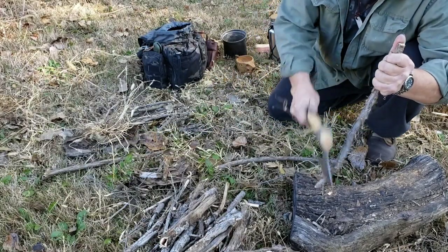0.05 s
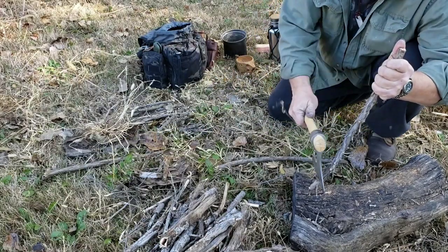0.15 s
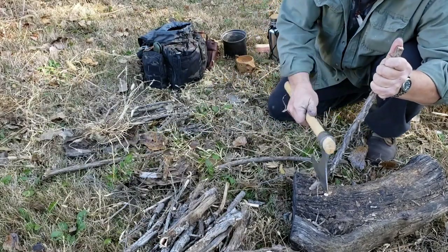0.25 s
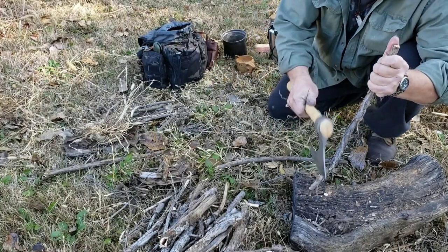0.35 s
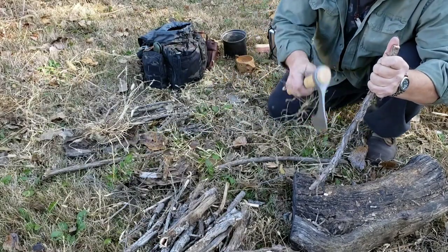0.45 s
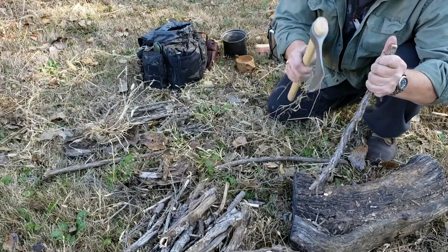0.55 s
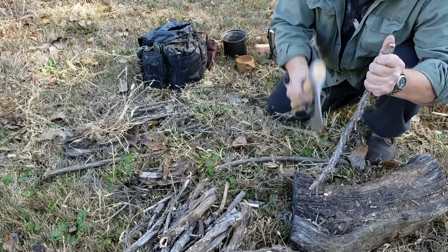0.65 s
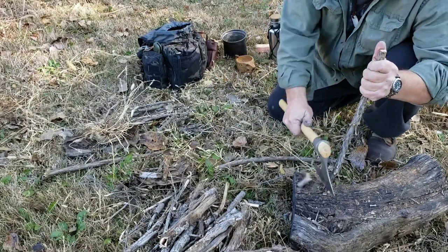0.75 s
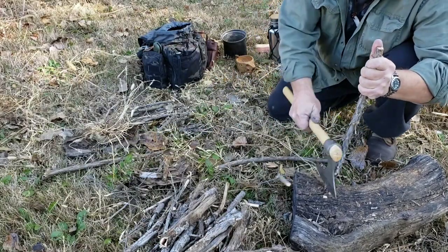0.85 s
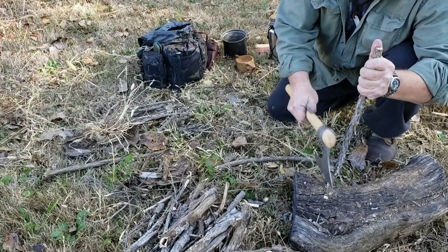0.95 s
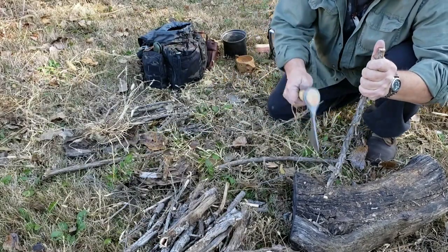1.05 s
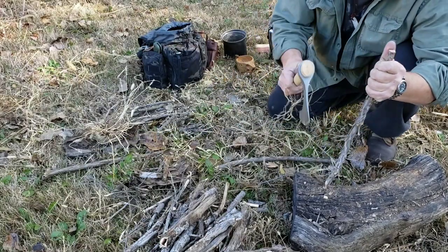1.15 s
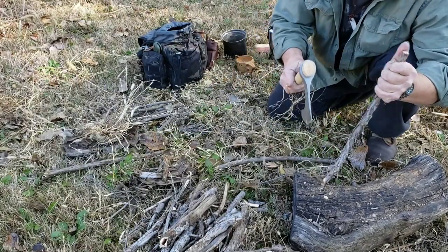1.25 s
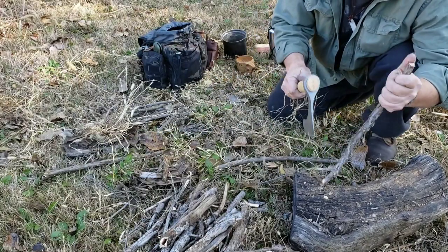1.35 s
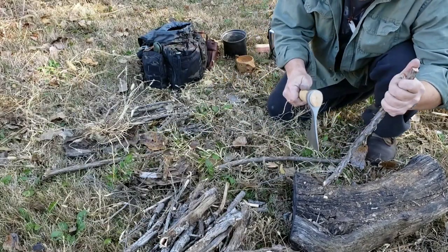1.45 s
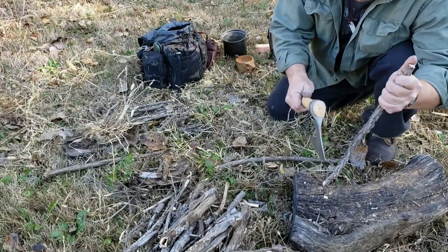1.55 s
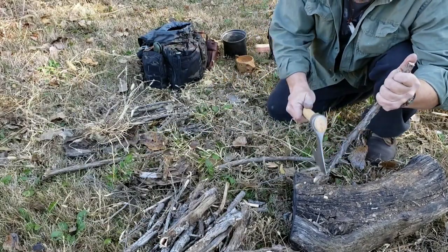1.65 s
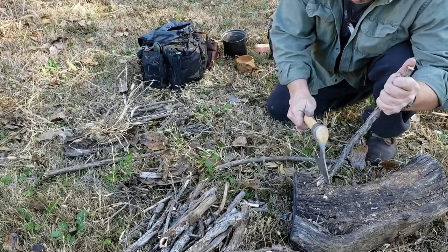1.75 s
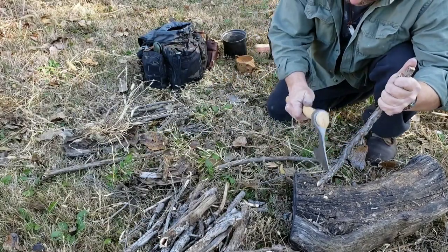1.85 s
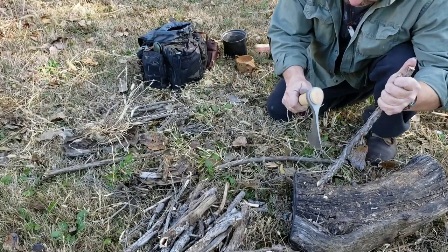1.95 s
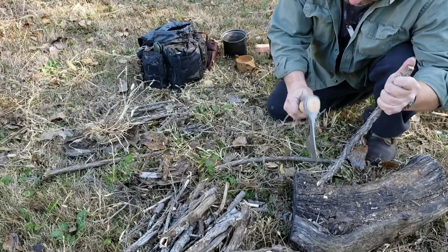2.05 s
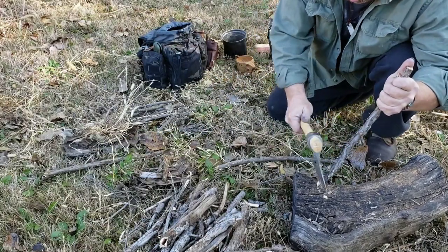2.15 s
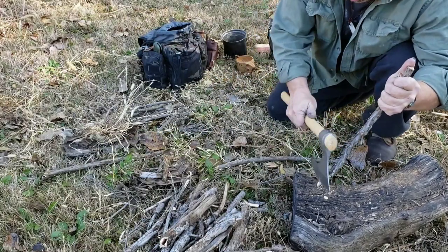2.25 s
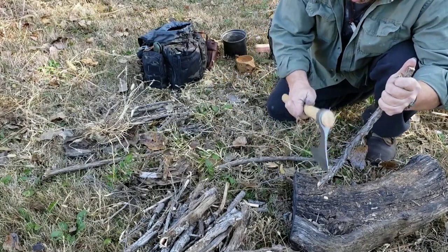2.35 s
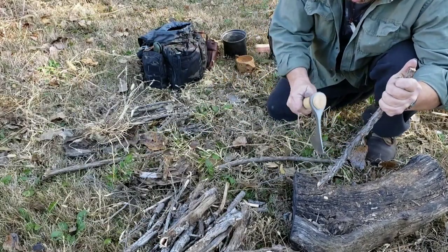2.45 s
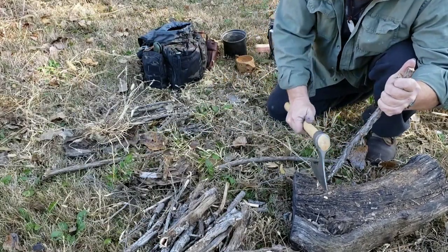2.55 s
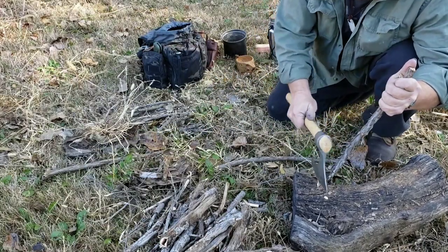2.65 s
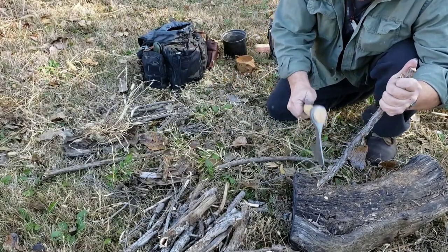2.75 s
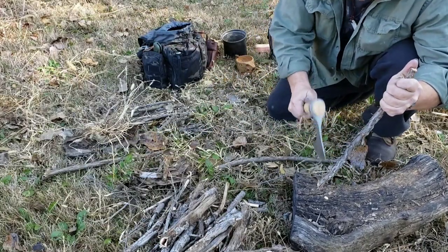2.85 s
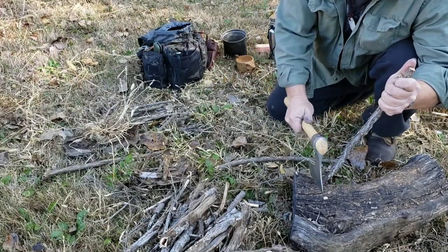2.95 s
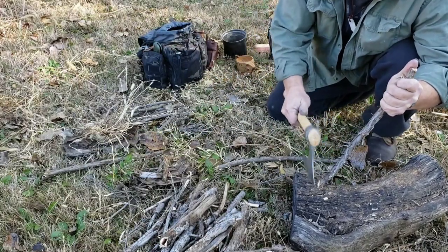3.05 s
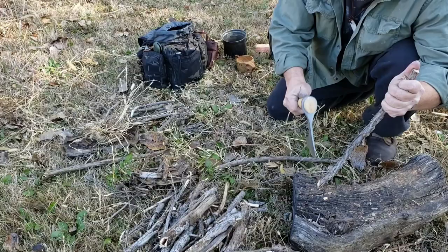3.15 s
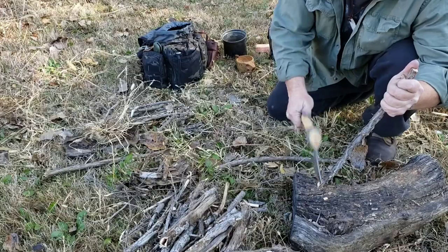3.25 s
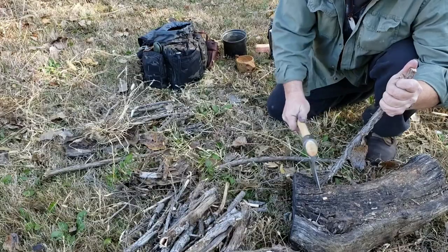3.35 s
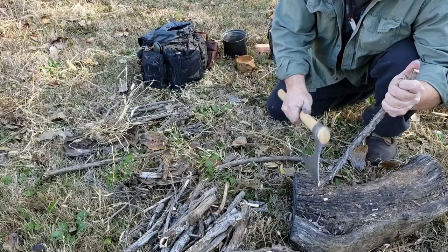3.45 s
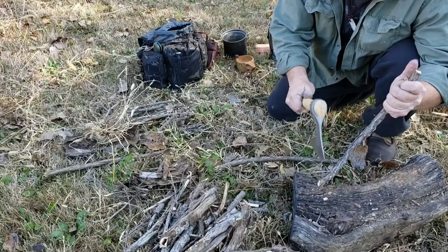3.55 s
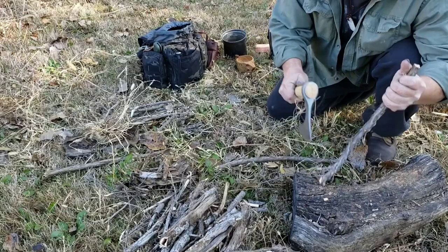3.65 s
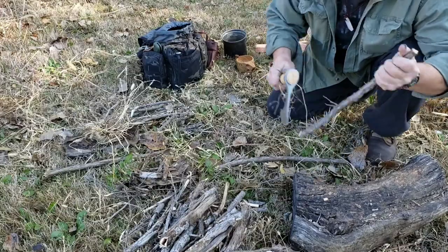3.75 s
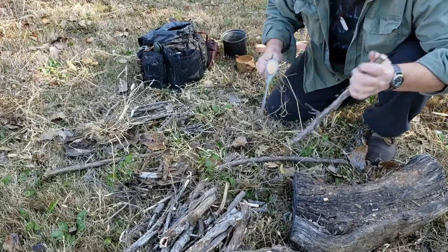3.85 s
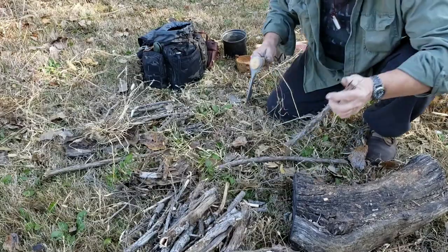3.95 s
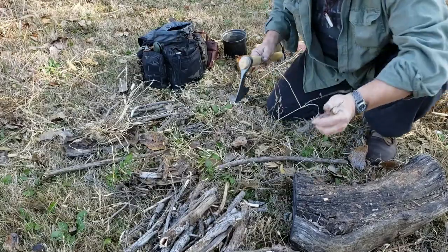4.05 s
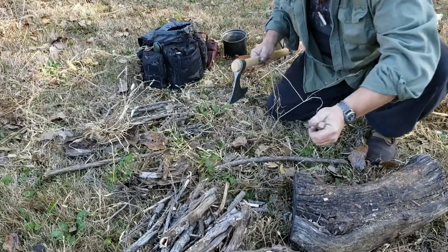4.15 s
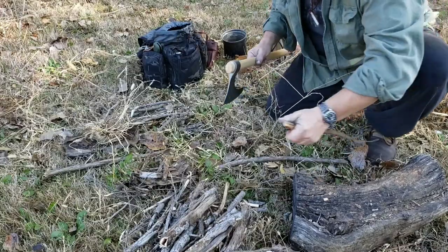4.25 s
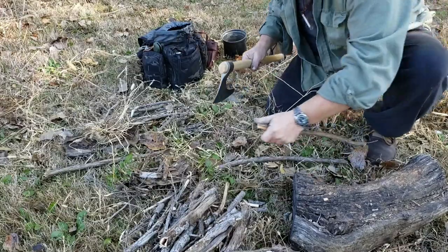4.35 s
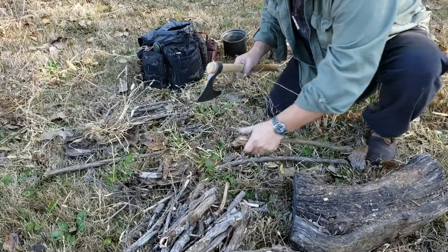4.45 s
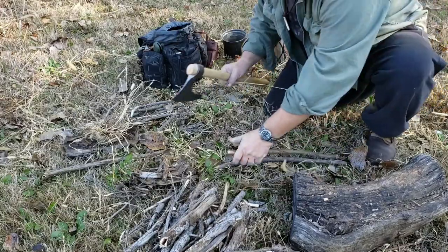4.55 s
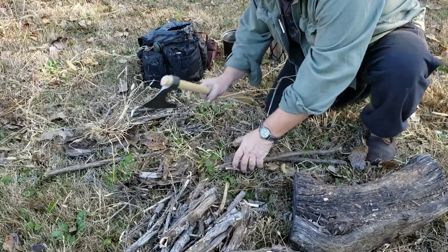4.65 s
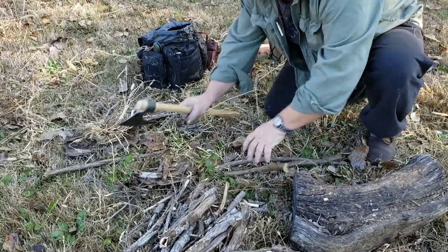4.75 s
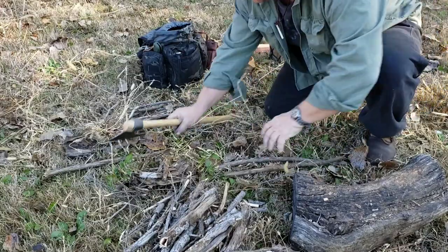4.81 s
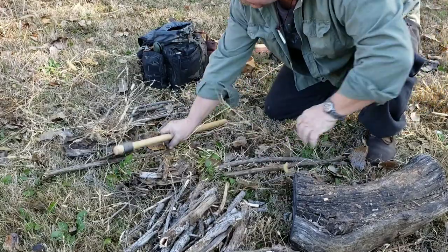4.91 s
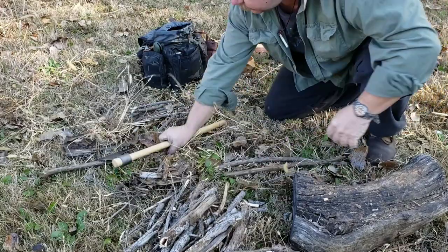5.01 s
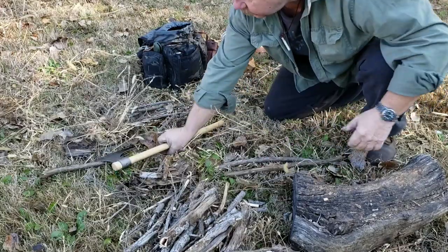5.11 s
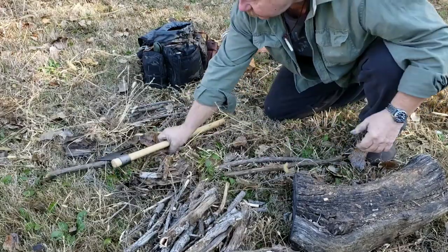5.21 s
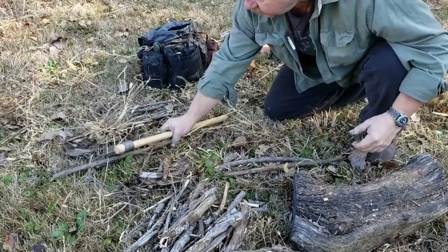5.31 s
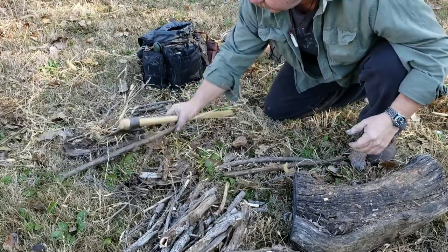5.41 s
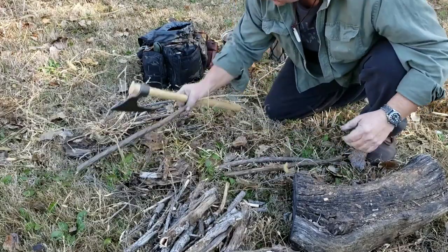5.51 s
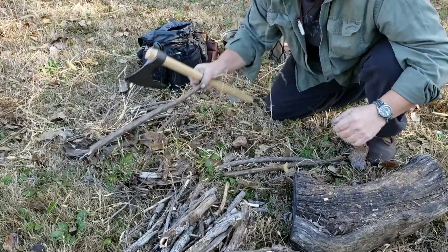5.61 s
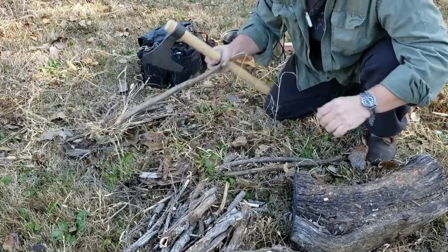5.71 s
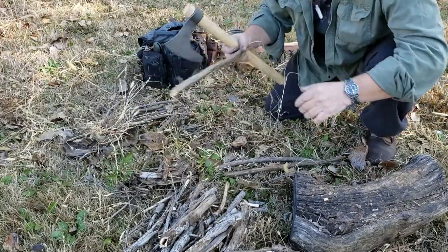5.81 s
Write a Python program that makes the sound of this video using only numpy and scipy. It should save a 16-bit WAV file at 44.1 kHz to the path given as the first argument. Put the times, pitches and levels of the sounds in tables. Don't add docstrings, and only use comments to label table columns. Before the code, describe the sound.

Six sharp, dry wood chops with snapping fibres and ticking chips, followed by soft grassy rustling and low thumping wind buffets in an open field.

```python
import sys
import numpy as np
from scipy import signal
from scipy.fft import rfft, irfft
from scipy.io import wavfile
from scipy.ndimage import uniform_filter1d

SR = 44100
rng = np.random.default_rng(int(sys.argv[2]) if len(sys.argv) > 2 else 0)


def amp(db):
    return 10 ** (np.asarray(db, float) / 20)


def write(x):
    x = np.atleast_2d(x).T
    wavfile.write(sys.argv[1], SR, np.round(np.clip(x, -1, 1) * 32767).astype(np.int16))


N = 259131

# (time [s], log level [dB], rocking [dB], scatter level [dB], shudder level [dB])
CHOPS = [
    (.179, -25, 12.5, -37.5, -44),
    (0.8153, -28.5, 8, -31.5, -47),
    (2.228, -28, 3.8, -45.5, -50),
    (2.6409, -26.5, 4.6, -46.5, -49),
    (3.016, -26, 4, -52.5, -41),
    (3.3842, -29.5, 2.5, -48, -46),
]


def evened(x):
    return x / np.sqrt(np.mean(x ** 2) + 1e-20)


def read(points, hz):
    f, value = np.transpose(points)
    return np.interp(np.log(hz + 1), np.log(f + 1), value)


def add(mix, start_s, sound):
    part = mix[max(round(start_s * SR), 0):][:len(sound)]
    part += sound[:len(part)]


def ring(modes, seconds, pitch=1.0, longer=0.94):
    t = np.arange(round(seconds * SR)) / SR
    return sum(amp(db - 60 * t / (t60_s * longer)) * np.sin(2 * np.pi * hz * pitch * t)
               for hz, db, t60_s in modes)


def drift(size):
    once = uniform_filter1d(rng.standard_normal(N), size=size)
    return evened(uniform_filter1d(once, size=size))


def swells(rows, power):
    t = np.arange(0, N, 32) / SR
    level = np.zeros(len(t))
    for peak_s, db, rise_ms, fall_ms in rows:
        span_ms = np.where(t < peak_s, rise_ms, fall_ms).clip(5)
        level += amp(db - 20 * (abs(t - peak_s) * 1000 / span_ms) ** power)
    return np.interp(np.arange(N) / SR, t, level)


def hiss(shape_db, patchy_db, size):
    hop = size // 4
    frames, hz = N // hop + 5, np.fft.rfftfreq(size, 1 / SR)
    a, b, patches = rng.standard_normal((frames, len(hz), 3)).T
    patches = uniform_filter1d(patches, size=6, axis=0)
    patches = evened(uniform_filter1d(patches, size=12, axis=1))
    level_db = shape_db(hz[:, None], np.arange(frames) * hop / SR) + patchy_db * patches
    z = (a + 1j * b) * amp(level_db)
    return signal.istft(z, nperseg=size, noverlap=size - hop)[1][:N]


def fractures(rows, grainy_db):
    out, size = np.zeros(N), 8192
    t, hz = np.arange(size) / SR, np.fft.rfftfreq(size, 1 / SR) + 1
    draws = rng.standard_normal((len(rows), 2, size))
    for (start_s, db, centre_hz, octaves, hold_s, t60_s), (noise, lumps) in zip(rows, draws):
        colour = np.exp(-.5 * (np.log2(hz / centre_hz) / max(octaves, .1)) ** 2)
        colour /= 1 + (hz / 13500) ** 4
        noise[12] += 9 * (hold_s < .0011)
        grains = irfft(rfft(noise) * colour)
        grains *= amp(grainy_db * evened(uniform_filter1d(lumps, size=24)))
        onset = np.minimum(t / 0.00028, 1)
        level = amp(-60 * np.maximum(t - hold_s, 0) / abs(t60_s)) * onset
        add(out, start_s, amp(db - 8.5) * evened(level * grains) * np.sqrt(np.mean(level ** 2)))
    return out


def calm():
    # (frequency [Hz], density [dB per Hz])
    air = [(12, -39), (20, -8.5), (67, 7), (101, -5.5), (123, -10.5), (434, -27), (527, -12), (607, -14),
           (678, -12.5), (825, -8), (923, -20), (2080, -19.5), (4420, -28), (7520, -19), (16000, -53)]
    return amp(-64.5) * evened(hiss(lambda hz, t: read(air, hz), 1.6, size=2048))


def rustle():
    # (peak time [s], level [dB], rise [ms], fall [ms])
    movements = [(.35, -65, 1160, 860), (1.03, -64.5, 460, 350), (1.85, -60.5, 178, 160),
                 (2.8, -65.5, 860, 630), (3.95, -67, 640, 1300), (4.606, -51.5, 9.2, 109),
                 (4.15, -65, 130, 180), (4.81, -57, 88, 320), (4.94, -60, 160, 170), (5.04, -56.5, 38, 165),
                 (5.12, -53.5, 210, 127), (5.33, -52, 126, 440), (5.58, -60, 490, 152),
                 (5.75, -56, 53, 100), (5.852, -54, 14, 45), (5.874, -58.5, 9.7, 50)]
    # (frequency [Hz], density [dB per Hz])
    straw = [(150, -32.5), (250, -6), (652, -5), (1460, -7), (1760, -17), (2570, -6.5), (3750, -10.5),
             (4680, -8.5), (7960, -11.5), (14500, -22.5)]
    rest_db, bright_db = -83, -60.5
    dulling = 0.11
    level = amp(rest_db) + swells(movements, 0.96)
    s = np.arange(N) / SR
    tilt_db = 0.29 + dulling * np.minimum(20 * np.log10(level) - bright_db, 0)

    def shape_db(hz, t):
        return read(straw, hz) + np.interp(t, s, tilt_db) * np.log2((hz + 50) / 4000)

    wash = evened(hiss(shape_db, 3.2, size=256))
    stalks_per_s = 1100
    breaks = rng.random(N) < stalks_per_s / SR
    strength = amp(4.5 * np.minimum(rng.exponential(1, N), 3.5)) * breaks
    stalk = rng.integers(0, 12, N)
    crackle = np.zeros(N)
    for k, hz in enumerate(np.geomspace(1300, 10500, num=12)):
        tick = ring([(hz, np.log2(hz / 4000), 16 / hz)], .01)
        crackle += signal.oaconvolve(strength * (stalk == k), tick)[:N]
    return level * evened(wash + amp(-5) * evened(crackle))


def litter():
    # (time [s], peak level [dB], centre
    # [Hz])
    chips = [(0.303, -52, 2320), (0.935, -44, 2520), (0.9708, -39.5, 3650), (1.029, -34, 9600),
             (1.045, -41, 6500), (1.07, -44, 3530), (1.1026, -45, 3530), (1.204, -44, 6640),
             (1.2195, -42, 2510), (1.224, -33.5, 2360), (1.257, -41, 7260), (1.4782, -45, 2690),
             (1.6548, -54.5, 7960), (1.7037, -30, 7660), (1.788, -38, 4450), (1.8635, -33.5, 4420),
             (1.927, -42, 2440), (1.674, -47.5, 2690), (1.915, -53, 3500), (2.3014, -35.5, 6500),
             (2.341, -45, 7130), (2.685, -36.5, 2270), (2.781, -40.5, 6400), (2.823, -47, 6220),
             (3.5039, -42.5, 1750)]
    # (time [s], peak level [dB], centre [Hz], spread [octaves])
    twigs = [(.0084, -28, 5800, 0.94), (0.4593, -42.5, 6160, 0.79), (1.779, -39, 6910, 0.57),
             (2.41, -42, 5100, 1), (2.578, -42.5, 8130, 0.72), (2.775, -39.5, 2655, 0.69),
             (4.7833, -44.5, 1555, .8), (4.8172, -47, 2590, .8), (4.848, -43, 4600, .5),
             (5.1205, -43, 4730, 1.0), (5.3167, -41.5, 1800, .8), (5.342, -39, 3470, 0.75),
             (5.41, -50, 3200, .6), (3.7492, -39.5, 5330, 0.74), (3.7672, -41, 3260, 1.44),
             (3.902, -42.5, 2380, 1.6), (3.915, -37, 2306, 1.9), (4.0867, -37, 2970, 1.8),
             (4.606, -47.5, 2100, 1.42), (4.799, -43, 4920, 1.16), (4.9248, -41.5, 2710, 0.24),
             (5.0282, -38, 4610, 1), (5.476, -42.5, 1900, 1.57), (5.6383, -40, 8180, 0.22),
             (5.7053, -39, 7870, 0.35), (5.7132, -26, 7900, 0.19), (5.7479, -36, 5240, 1.2),
             (5.851, -33, 4500, 0.8)]
    chip_octaves, scuff_s, t60_s = 1.27, 0.00046, 0.018
    rows = [(*row, chip_octaves) for row in chips] + twigs
    return fractures([(*row, scuff_s, t60_s) for row in rows], grainy_db=4.0)


def wind():
    # (peak time [s], peak level [dB], width [ms], frequency [Hz])
    gusts = [(3.623, -48, 31, 67), (3.696, -59, 8, 41.1), (3.737, -36.5, 26.3, 52.4),
             (3.783, -41, 16, 45.8), (3.825, -37.5, 16.7, 48.1), (3.871, -48, 19, 50.7),
             (3.922, -46.5, 15, 53.3), (3.971, -47, 16, 49.6), (4.019, -56.4, 17, 43.8),
             (4.057, -44, 16, 44.3), (4.092, -38.8, 21.5, 62.9), (4.205, -35, 10, 70),
             (4.242, -36.5, 24, 47.4), (4.315, -36.8, 34, 42.6), (4.4, -32.5, 28.4, 48),
             (4.452, -52, 6, 42.7), (4.546, -43.5, 32, 50.8), (4.628, -41, 8.5, 59),
             (4.66, -30.5, 11, 55.9), (4.699, -27.5, 28, 60.2), (4.734, -24, 29, 54.2),
             (4.843, -41, 12, 61.9), (4.898, -36, 43, 50.3), (4.939, -39.5, 8, 61.4),
             (4.972, -33, 25.6, 83.3), (5.053, -41.5, 24, 48), (5.134, -50.9, 12, 42),
             (5.17, -57, 18, 37.3), (5.202, -46.5, 12, 51.2), (5.248, -32, 10, 42.9),
             (5.281, -24, 15, 53.3), (5.331, -31.5, 11, 59.9), (5.368, -20.5, 21, 49.54),
             (5.424, -19.5, 17.4, 51.2), (5.477, -22, 18.4, 48.5), (5.537, -32.5, 10, 56),
             (5.611, -28, 49, 54.3), (5.671, -19.0, 15.4, 62.3), (5.732, -25.5, 31.5, 51.96),
             (5.836, -32.5, 23, 58), (5.871, -30, 6, 87)]
    # (peak time [s], level [dB])
    puffs = [(.02, -76), (.15, -51.5), (0.799, -35.5), (0.055, -63), (1.228, -61.5), (1.501, -63),
             (1.588, -62.5), (1.662, -61.5), (1.736, -61), (1.95, -61.5), (2.01, -59.5), (2.134, -62),
             (2.2, -66)]
    fall_widths, rise_per_fall = 1.47, .7
    sag, kink_db = .35, -15
    skirt_db, skirt_s = -16.5, .05
    puff_ms, puff_hz = 22, 52
    eddies = gusts + [(s, db + 0.5, puff_ms / fall_widths, puff_hz) for s, db in puffs]
    t, swing = np.arange(-.15, .15, 1 / SR), np.zeros(N)
    for (peak_s, db, ms, hz), (start, kink) in zip(eddies, rng.random((len(eddies), 2))):
        fall_s = max(ms, 14) * fall_widths / 1000
        cycles = np.cumsum(hz * np.exp(-sag * np.tanh(t / fall_s))) / SR
        turn = 2 * np.pi * (cycles + start)
        level = amp(db - 20 * (t / np.where(t < 0, rise_per_fall * fall_s, fall_s)) ** 2)
        overtone = amp(kink_db) * np.sin(2 * turn + 2 * np.pi * kink)
        add(swing, peak_s + t[0], level * (np.sin(turn) + overtone))
    level = np.sqrt(abs(uniform_filter1d(swing ** 2, size=round(skirt_s * SR))))
    skirt = evened(hiss(lambda hz, t: -13 * abs(np.log2((hz + 5) / 80)), 2.8, size=1024))
    rough = amp(skirt_db) * level ** 0.9 * skirt
    return signal.lfilter(*signal.butter(2, 24, "high", fs=SR), swing + rough)


def fibres():
    # (time [s], peak level [dB], centre [Hz], spread [octaves])
    clean = [
        (0.1606, -11, 8990, 0.48),
        (0.1681, -5, 4300, 0.6),
        (0.1707, -9, 9260, 0.93),
        (0.799, -3, 7345, 0.84),
        (.805, -10, 4406, 1.3),
        (.8088, -1.5, 6800, 0.7),
        (0.8275, -13, 7930, 1.1),
        (.296, -42, 12300, 0.51),
        (1.6908, -20, 5140, 0.38),
        (1.696, -26.5, 5070, 0.59),
    ]
    # (time [s], peak level [dB], centre [Hz], spread [octaves], tearing time [s])
    tears = [(0.154, -24, 6000, 2.3, 0.0086), (0.165, -7, 3700, 1.5, 0.0062),
             (0.18, -13.5, 2800, 0.12, 0.0021), (0.793, -24.5, 4000, 1.5, 0.0038),
             (.801, -11.5, 1887, 0.3, .003), (.803, -11.5, 3508, .35, 0.0046),
             (0.8123, -22, 5870, 0.66, 0.012), (0.811, -22, 1500, 1.2, 0.022),
             (1.668, -37.5, 7500, 0.72, 0.0016), (2.208, -22.5, 5000, 1.8, 0.0016),
             (2.2127, -15, 4990, 2.38, 0.0031), (2.212, -22, 2154, 0.485, 0.0064),
             (2.616, -38, 3030, 0.97, 0.014), (2.6287, -16.5, 4340, 1.2, 0.005),
             (2.631, -20, 2700, 0.11, 0.0048), (2.99, -37.5, 3980, 1.6, 0.0051),
             (3.02, -42, 2900, 0.33, 0.019), (3.385, -44, 2800, .35, 0.017),
             (2.642, -41.5, 2700, 0.27, 0.0155), (3.001, -26.5, 4500, 2, 0.00099),
             (3.002, -24.5, 1320, 0.77, 0.0034), (3.005, -25, 7560, 0.61, 0.0041),
             (3.0096, -18.5, 2495, 0.3, .005), (3.356, -49, 8000, 0.94, 0.013),
             (3.371, -20.5, 5000, 2.4, 0.005), (3.374, -16.5, 2230, 0.55, 0.0031),
             (2.2029, -45, 3540, 1.7, 0.0046), (1.78, -56, 1390, 1, 0.12)]
    snap_s, snap_t60_s, tear_t60_s = 0.00094, 0.0068, 0.017
    scatter = (4500, 0.9, 0.014, 0.33)
    shudder = (960, 0.58, 0.006, 0.67)
    rows = [(*row, snap_s, snap_t60_s) for row in clean] + [(*row, tear_t60_s) for row in tears]
    tails = [(s - .004, scatter_db, *scatter) for s, _, _, scatter_db, _ in CHOPS]
    tails += [(s, shudder_db, *shudder) for s, _, _, _, shudder_db in CHOPS]
    return fractures(rows, grainy_db=5.0) + fractures(tails, grainy_db=4.5)


def stake():
    # (time [s], level [dB], pitch factor, ring time factor, tilt [dB per octave])
    knocks = [(0.1666, -13, 1.1, 1.5, 6.5), (0.1689, -11, 0.85, 1.5, -3), (0.1715, -13, 0.91, 1.5, -3),
              (0.187, -28.5, 0.6, 1.2, -8), (0.799, -21.5, 1.2, 1.5, -1.5), (0.8243, -26, 0.68, 1.2, -0.5),
              (0.8291, -11.5, 0.69, 0.74, -9.5), (2.216, -24, 1.05, 1.8, 3),
              (2.2208, -13.5, 1.09, 1.23, -6), (2.2246, -23, 0.77, 1.5, -3), (2.228, -27.5, 0.58, 1.6, 3),
              (2.63, -9.5, 0.79, 1.8, 3), (2.6323, -5.5, 1.12, 1.25, 1.5), (2.6353, -9.5, 1.03, 1.2, 0.5),
              (3.0095, 1, 1.086, 1.27, 2.5), (3.0162, -18, 0.96, 1.1, 0), (3.023, -22.5, 0.74, 1.3, 1.5),
              (3.376, 2.5, 1.07, 1.17, -0.5), (3.3832, -17, 1.3, 0.92, -2), (.455, -48.5, 1.1, 3.2, 8),
              (1.691, -54, 1.23, 6.3, 6), (1.79, -46.5, 1.12, 3.6, 2), (1.803, -49, 1.1, 4.7, 1),
              (1.859, -44.5, 1.07, 3.6, 5), (1.885, -59, 1.2, 3.2, 3), (3.766, -50, 0.91, 3.6, 10)]
    # (frequency [Hz], level [dB], t60 [s])
    stake_modes = [(290, -26, .02), (427, -2, .024), (635, -14, .018), (835, 1.5, .017), (975, -12, .025),
                   (1105, -4, .014), (1240, -7, .016), (1475, 1.5, .01), (1815, -8, .014), (2380, -12, .01),
                   (2680, -10, .016)]
    contact_s, softness = .0006, 2.0
    choke_s, choke_db_per_s = .0085, 1500
    rebound_s, rebound = .0019, .7
    out, t = np.zeros(N), np.arange(round(.15 * SR)) / SR
    choke = amp(-choke_db_per_s * np.maximum(t - choke_s, 0))
    for start_s, db, pitch, longer, tilt_db in knocks:
        phase = np.arange(200) / SR / (contact_s / pitch ** softness)
        push = np.sin(np.pi * np.clip(phase, 0, 1))
        push = push / push.sum()
        push = push - rebound * np.roll(push, round(rebound_s * SR))
        modes = [(hz, mode_db + tilt_db * np.log2(hz / 900), t60_s)
                 for hz, mode_db, t60_s in stake_modes]
        body = ring(modes, .15, pitch, longer)
        if db > -44:
            body = body * choke
        add(out, start_s, -amp(db - 8) * np.convolve(push, body))
    return signal.lfilter(*signal.butter(3, 310, "high", fs=SR), out)


def head(cracks):
    # (frequency [Hz], level [dB], t60 [s])
    steel = [(2900, -5.5, 0.019), (3360, -5.5, 0.05), (4630, -5.5, 0.034), (6910, -1.5, 0.048),
             (7430, -9, 0.045), (8130, -1.5, 0.035), (8990, 0.5, 0.025)]
    # (time [s], level [dB], frequency [Hz], swell time [s], t60 [s])
    sings = [(1.795, -58, 4344, .07, .15), (1.843, -63, 8193, .04, .1), (1.86, -62, 6508, .02, .12),
             (1.895, -70, 9100, .03, .08), (1.935, -65, 2422, .1, .45), (2.79, -61, 6300, .02, .1),
             (3.381, -50, 13840, .004, .1), (3.53, -73, 2440, .05, .3), (.835, -52, 6500, .05, .12),
             (2.218, -56, 4280, .008, .06), (.168, -13, 955, .008, .022), (.172, -40, 4250, .01, .06),
             (.185, -46, 3300, .01, .05), (.862, -56, 4300, .02, .05), (3.89, -60, 2250, .015, .06),
             (3.388, -58, 9195, .008, .15), (3.40, -62, 7420, .015, .12), (.455, -64, 6500, .02, .08),
             (1.82, -63, 4167, .06, .2)]
    out, t = np.zeros(N), np.arange(SR // 2) / SR
    for start_s, db, hz, swell_s, t60_s in sings:
        rise = np.minimum(t / (0.19 * swell_s), 1)
        level = rise * amp(db - 60 * np.maximum(t - swell_s, 0) / t60_s)
        add(out, start_s, level * np.sin(2 * np.pi * hz * t))
    chatter = amp(3 * drift(size=150))
    return out * chatter + amp(-38) * signal.oaconvolve(cracks, ring(steel, .2))[:N]


def log():
    # (frequency [Hz], level [dB], t60 [s])
    log_modes = [(48, -18.5, 0.4), (61.7, -22, 0.74), (67.93, -21.5, 1.1), (76.8, 2.6, .42),
                 (82.5, -2.5, 0.14), (110, -8, 0.29), (120, -18, 0.17), (200, -15, 0.3)]
    rock_hz = 70
    twin = (79, -8, .5)
    out, t = np.zeros(N), np.arange(SR) / SR
    for (start_s, db, rock_db, *_), noise in zip(CHOPS, rng.standard_normal((len(CHOPS), SR))):
        soil = evened(signal.lfilter(*signal.butter(2, 110, fs=SR), noise)) * amp(-24 - 60 * t / 0.48)
        modes = [(hz, mode_db + rock_db * (hz < rock_hz), t60_s) for hz, mode_db, t60_s in log_modes]
        hum = ring(modes, 1) - ring([twin], 1)
        add(out, start_s, amp(db) * (hum + soil) * np.minimum(t / 0.004, 1))
    return signal.lfilter(*signal.butter(2, 42, "high", fs=SR), out)


def trees(x):
    # (delay [s], level [dB])
    trunks = [
        (.025, -38),
        (.049, -39),
        (.078, -36),
        (.118, -42),
    ]
    dull_hz, blur_s = 3200, .0012
    out, t = np.zeros(SR // 5), np.arange(600) / SR
    for (delay_s, db), blur in zip(trunks, rng.standard_normal((len(trunks), len(t)))):
        blur = blur * np.exp(-t / blur_s)
        add(out, delay_s, amp(db) * blur / np.linalg.norm(blur))
    return signal.oaconvolve(x, signal.lfilter(*signal.butter(1, dull_hz, fs=SR), out))[:N]


def field(x):
    # (frequency [Hz], t60 [s])
    decay = [(200, 0.1), (1000, 0.29), (3000, .2), (10000, 0.57)]
    taps = rng.choice([-1., 1.], SR // 2) * (rng.random(SR // 2) < .05)
    taps[:300] = 0
    hz, t, z = signal.stft(taps, SR, nperseg=256)
    tail = signal.istft(z * amp(-60 * t / read(decay, hz)[:, None]), SR, nperseg=256)[1]
    return signal.fftconvolve(x, tail / np.linalg.norm(tail))[:N]


def scene():
    cracks = fibres() + litter()
    chops = cracks + stake() + head(cracks)
    echoes = amp(-41) * field(chops) + trees(chops)
    mono = chops + echoes + log() + rustle() + wind() + calm()
    return np.array([mono, mono])


def band_limit(x):
    return signal.sosfilt(signal.butter(12, 16650, fs=SR, output="sos"), x)


def record(dry):
    edge_hz, top_hz, ceiling = 15400, 16600, .94
    side_blur = rng.standard_normal(400) * np.exp(-np.arange(400) / 80)
    side_blur = signal.lfilter(*signal.butter(2, 130, "high", fs=SR), side_blur)
    side = amp(-35) * signal.oaconvolve(dry[0], side_blur / np.linalg.norm(side_blur))[:N]
    pair = dry + np.array([side, -side])
    edge = signal.firwin(301, edge_hz, fs=SR)
    edge = edge + amp(-15) * (signal.firwin(301, top_hz, fs=SR) - edge)
    pair = signal.oaconvolve(pair, edge[None], "same")
    return band_limit(np.clip(0.96 * pair, -ceiling, ceiling))


dry = scene()
out = record(dry)
write(out)
```